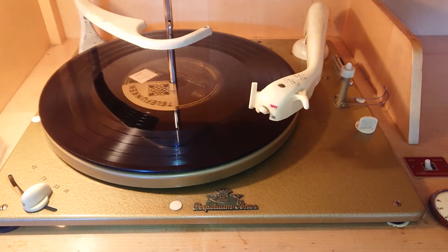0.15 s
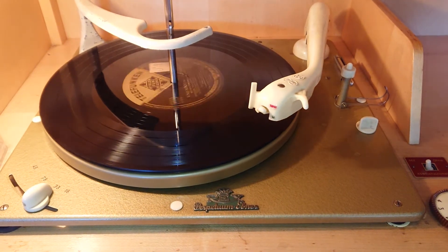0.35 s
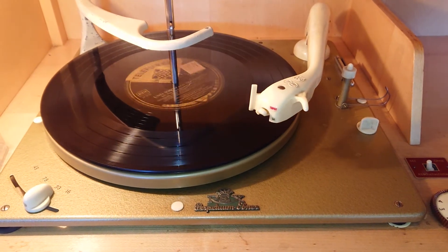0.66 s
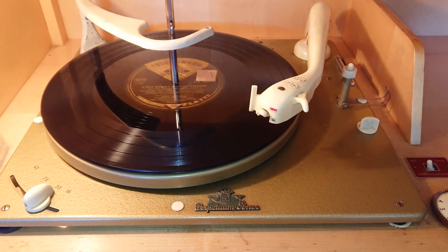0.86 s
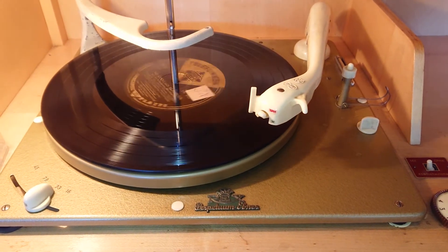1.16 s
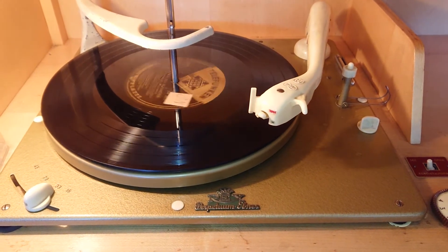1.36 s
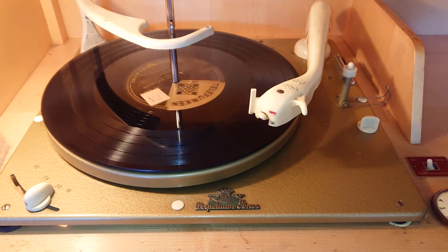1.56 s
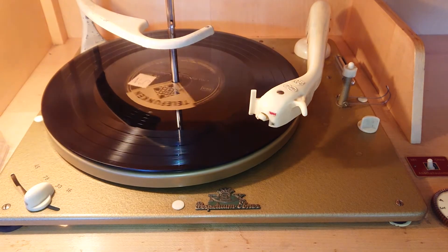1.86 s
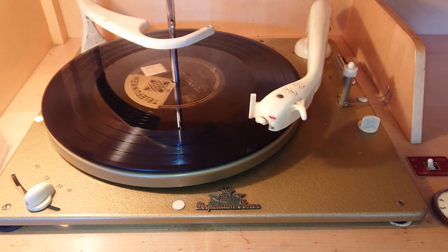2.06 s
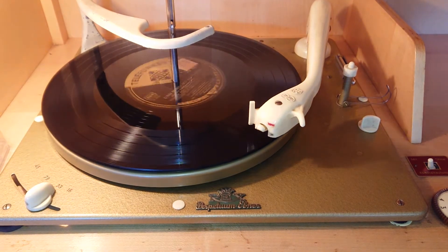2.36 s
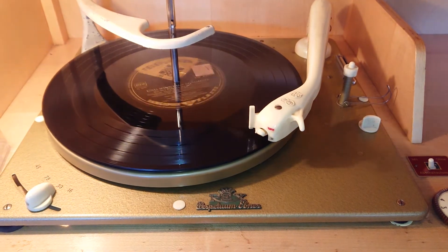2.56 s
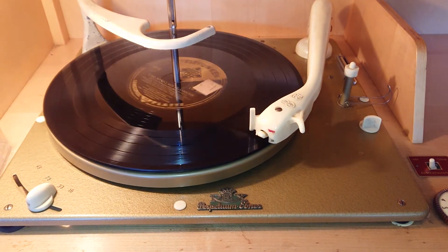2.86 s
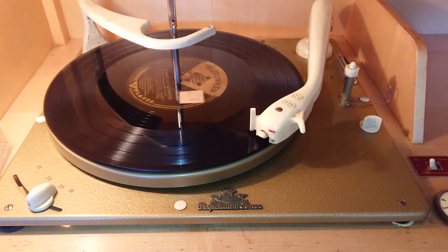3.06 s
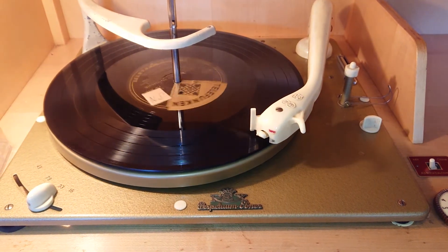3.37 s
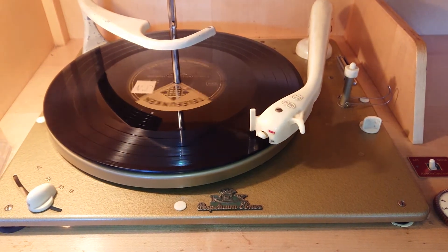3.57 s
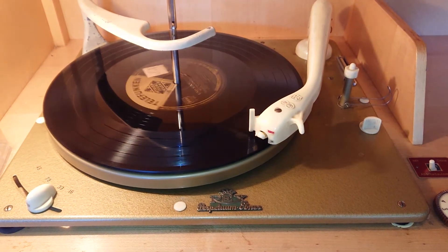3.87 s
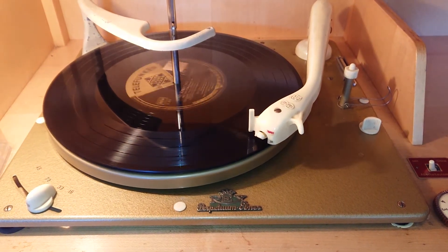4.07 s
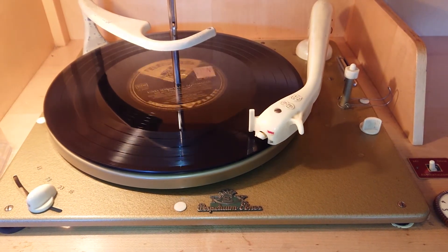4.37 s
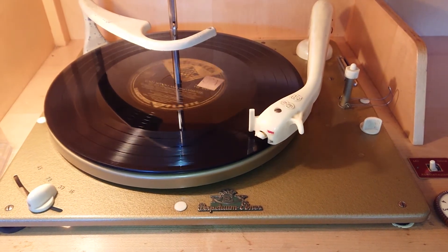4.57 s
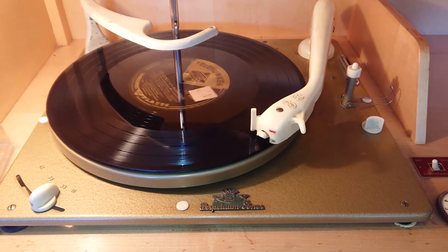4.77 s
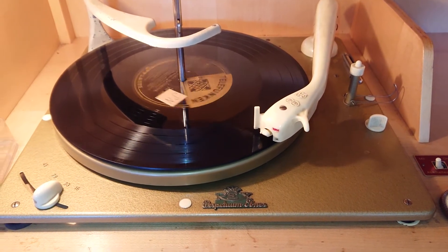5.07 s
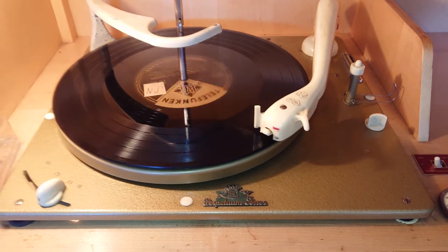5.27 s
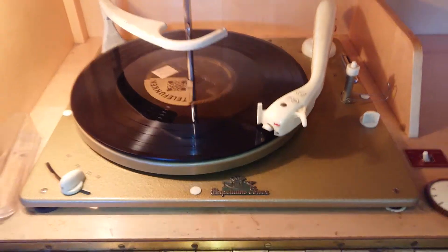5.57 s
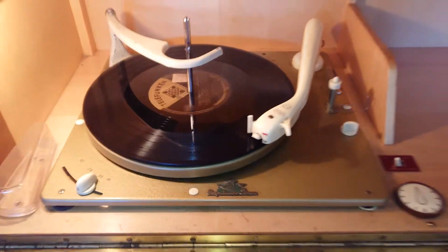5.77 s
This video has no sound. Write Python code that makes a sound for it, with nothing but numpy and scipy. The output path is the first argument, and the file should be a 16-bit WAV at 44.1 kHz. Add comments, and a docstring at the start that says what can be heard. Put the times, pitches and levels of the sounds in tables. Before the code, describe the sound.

Low motor hum from a spinning record changer, followed by clunks and irregular metallic clicking as its change cycle starts.

```python
"""A quiet room with a record changer in a wooden cabinet. The motor hums on the mains, the drive
wheel rubs and the platter ticks faintly. Then the change cycle engages: cams drag in stick-slip,
levers strike and ring the deck plate, the cabinet panels thud and a latch clacks. A faint rustle
comes in near the end. Two spaced microphones hear the bass alike and the treble each in its own way."""
import sys
import numpy as np
from scipy import signal
from scipy.fft import rfft, irfft, next_fast_len
from scipy.io import wavfile

SR = 44100
rng = np.random.default_rng(int(sys.argv[2]) if len(sys.argv) > 2 else 0)


def persist_wave(psi):
    """Save psi, clipped to +-1, as 16-bit WAV."""
    counts = np.round(np.clip(psi, -1, 1) * 32767).astype(np.int16)
    wavfile.write(sys.argv[1], SR, np.atleast_2d(counts).T)


N = 260631
CYCLE_START_S = 2.77


def from_db(db):
    return 10 ** (np.asarray(db) / 20)


def rms_one(x):
    return x / np.sqrt(np.mean(x ** 2) + 1e-20)


def at_hz(points, hz):
    points_hz, values = np.transpose(points)
    return np.interp(np.log(hz), np.log(points_hz), values)


def drift(rate_hz):
    """Slow random wander, rms 1."""
    pole = np.exp(-80 * np.pi * rate_hz / SR)
    slow = signal.lfilter([1], [1, -2 * pole, pole * pole], rng.standard_normal(N // 40 + 2002))[2000:]
    return np.interp(np.arange(N) / 40, np.arange(len(slow)), rms_one(slow))


# Left-right correlation of the changer: freq_hz, correlation
DIRECT_CORRELATION = [(60, 0.93), (180, 1), (300, 0.85), (500, 0.37), (900, 0.16), (1500, -0.24),
                      (4000, -0.016), (15000, -0.044)]
def mic_phase(hz):
    """Phase gap between the microphones, radians."""
    return np.arccos(np.clip(at_hz(DIRECT_CORRELATION, hz), -1, 1))


def coloured_noise(spectrum, correlation=DIRECT_CORRELATION, count=N):
    """Partly correlated stereo noise, rms 1."""
    size = next_fast_len(count)
    hz = np.maximum(np.arange(size // 2 + 1) * SR / size, 1)
    mid, side = rfft(rng.standard_normal((2, size)))
    alike = np.clip(at_hz(correlation, hz), -1, 1)
    stereo = np.sqrt(1 + alike) * mid + np.sqrt(1 - alike) * side * [[1], [-1]]
    return rms_one(irfft(stereo * from_db(at_hz(spectrum, hz)), size)[:, :count])


def soft_onset(ring, rise_s):
    """Onset rounded by the contact time; energy 1."""
    ring = ring * (1 - np.exp(-np.arange(ring.shape[1]) / SR / rise_s))
    return ring / np.sqrt(np.mean(np.sum(ring ** 2, 1)))


def modal_ring(modes, rise_s, spread_db=0.0):
    """Stereo impulse response of a struck body: damped sines."""
    hz, level_db, t60_s = np.transpose(modes)[:, :, None]
    t = np.arange(SR // 2) / SR
    decay = from_db(level_db + spread_db * rng.standard_normal(hz.shape) - 60 * t / t60_s)
    gap = mic_phase(hz) * rng.choice([-1, 1], hz.shape)
    phase = 2 * np.pi * hz * t + rng.uniform(0, 2 * np.pi, hz.shape)
    ring = [np.sum(decay * np.sin(phase + side * gap / 2), 0) for side in (1, -1)]
    return soft_onset(np.array(ring), rise_s)


def dense_ring(spectrum, t60_s, echo_db, echo_t60_s, rise_s):
    """Unresolved modes as noise: fast decay, then the cabinet and room echo."""
    fall = -np.log(1000) * np.arange(SR // 2) / SR
    envelope = np.exp(fall / t60_s) + from_db(echo_db) * np.exp(fall / echo_t60_s)
    return soft_onset(coloured_noise(spectrum, count=SR // 2) * envelope, rise_s)


def excite(forces, make_ring, *args, **settings):
    """Each force row drives one spot with its own ring."""
    return sum(signal.fftconvolve(force[None], make_ring(*args, **settings), axes=1)[:, :N]
               for force in forces)


def rattle(start_s, level_db, length_s=0.0052, touches=40, spots=5):
    """Force per spot: each contact is one firm touch, then weaker ones."""
    force = np.zeros((spots, N + SR))
    draw = rng.random((len(start_s), touches, 2))
    delay_s = -np.log(1 - 0.95 * draw[..., 0]) * length_s * (np.arange(touches) > 0)
    polarity = np.sign(draw[..., 1] - 0.5)
    sizes = from_db(level_db)[..., None] * polarity * np.where(delay_s > 0, 0.13, 0.55)
    spot = np.arange(len(start_s))[:, None] % spots
    sample = np.round((start_s[:, None] + delay_s) * SR).astype(int)
    np.add.at(force, (spot, sample), sizes)
    return force[:, :N]


def off_pitch_db(hz, pitch_hz, db_per_octave, floor_db):
    """Modes away from the pitch of a blow take less of it."""
    return np.maximum(-db_per_octave * np.abs(np.log2(hz / pitch_hz)), floor_db)


# Room noise: freq_hz, relative_density_db
ROOM_SPECTRUM = [(15, -58), (25, -21), (65, -8), (144, -11.5), (172, -21), (201, -13), (229, -18),
                 (256, -22), (357, -24.5), (521, -29), (595, -24), (777, -26), (849, -28), (969, -27.5),
                 (5000, -43.5), (6500, -69), (11000, -120)]
# Left-right correlation of the background: freq_hz, correlation
ROOM_CORRELATION = [(60, 0.3), (180, 0.76), (550, 0.27), (1650, -0.2), (4970, 0.054), (15000, -0.088)]
def room_tone():
    """Low, slightly wavering background."""
    return from_db(-60.5 + drift(5.3)) * coloured_noise(ROOM_SPECTRUM, ROOM_CORRELATION)


# Treble hiss: freq_hz, relative_density_db
HISS_SPECTRUM = [(2350, -17.5), (4000, -11), (4780, -1), (5950, -4), (6500, -14.5), (6620, -9.5),
                 (8200, -29), (8960, -47.5), (9450, -17.5), (9970, -2), (15100, -10), (16200, -15.5),
                 (16500, -40.5)]
def hiss():
    """Steady hiss, louder on the left."""
    return from_db(-78) * coloured_noise(HISS_SPECTRUM, ROOM_CORRELATION) * from_db([[2], [-2]])


# Motor partials: mains_multiple, rms_db
HUM_PARTIALS = [(1, -62), (2, -70.5), (4, -53), (5, -77), (6, -80), (7, -77), (8, -79.5), (11.84, -77.5),
                (13, -78.5), (15, -77.5), (17, -69), (29, -83)]
def motor_hum(mains_hz=50):
    """Mains overtones, each wavering in phase and level."""
    t, out = np.arange(N) / SR, 0
    for multiple, rms_db in HUM_PARTIALS:
        hz = multiple * mains_hz
        offset = mic_phase(hz) * np.array([[0.5], [-0.5]])
        phase = 2 * np.pi * (hz * t + rng.random()) + 0.091 * drift(0.62)
        out += np.sqrt(2) * from_db(rms_db + 0.54 * drift(0.82)) * np.sin(phase + offset)
    return out


def split_mode(mode, width):
    """Three beating neighbours, closer for longer rings."""
    hz, level_db, t60_s = mode
    return [(hz + width * step / t60_s ** 2, level_db - 5.8 * abs(step), t60_s) for step in (-1.3, 0, 1)]


# Platter modes: freq_hz, level_db, t60_s
PLATTER_MODES = [(444, 9, 0.14), (930, 2, 0.12), (1210, 4, 0.055), (2550, 0, 0.036), (3340, 0, 0.12),
                 (4770, 0, 0.12), (6300, 0, 1.8)]
# Dense platter modes: freq_hz, relative_density_db
PLATTER_SPECTRUM = [(470, -34), (800, -11), (937, -6), (2250, -19), (2570, -11), (2800, -18), (4660, -27),
                    (6500, -36), (8450, -60), (14300, -120)]
# Platter ticks: start_s, force_db, pitch_hz
PLATTER_TICKS = [(0.7119, -26.5, 2380), (1.1841, -28, 2400), (1.9117, -26, 1250), (2.4764, -41, 980)]
def platter():
    """Regular drive-wheel rubs, high tinks and a few ticks ring the platter until the cycle starts."""
    rubs = rattle(np.arange(0.058, CYCLE_START_S, 0.748), -38.5, length_s=0.031, touches=150, spots=2)
    out = from_db(1.5) * excite(rubs, modal_ring, PLATTER_MODES[1:3], rise_s=0.001)
    tinks = rattle(np.arange(0.308, CYCLE_START_S, 0.864), -39, length_s=0.018, touches=30, spots=1)
    tink_modes = split_mode(PLATTER_MODES[4], width=1.5) + split_mode(PLATTER_MODES[5], width=1.4)
    out += excite(tinks, modal_ring, tink_modes, rise_s=0.001)
    start_s, force_db, pitch_hz = np.transpose(PLATTER_TICKS)
    for mode in PLATTER_MODES:
        hz, level_db, _ = mode
        ring_db = force_db + level_db + 2 + off_pitch_db(hz, pitch_hz, db_per_octave=30, floor_db=-17.5)
        ring_db -= 30 * np.maximum(np.log2(hz / pitch_hz) - 1.5, 0)  # roll-off past 1.5 octaves up
        force = rattle(start_s, ring_db, touches=2, spots=1)
        out += excite(force, modal_ring, split_mode(mode, width=0.603), rise_s=0.00053)
    ticks = rattle(start_s, force_db, spots=2)
    return out + excite(ticks + rubs, dense_ring, PLATTER_SPECTRUM,
                        t60_s=0.037, echo_db=-19, echo_t60_s=0.44, rise_s=0.00077)


# Cam drag: time_s, lever_force_db, cabinet_force_db
CAM_DRAG = [(2.77, -71, -67), (2.84, -58, -51), (2.95, -51.5, -39), (3.08, -53.5, -48.5), (3.24, -50, -39),
            (3.42, -60, -55.5), (3.52, -51.5, -40), (3.65, -52.5, -53.5), (3.95, -57, -56),
            (4.1, -49.5, -50), (4.25, -56.5, -54.5), (4.45, -58, -57.5), (4.54, -50.5, -46.5),
            (4.67, -58, -54.5), (4.76, -50.5, -50.5), (5.03, -58.5, -52.5), (5.3, -50.5, -50),
            (5.59, -56.5, -52), (5.91, -53, -49)]
def cams(slips_per_s=1200, spread_db=3, spots=5):
    """Stick-slip of the cams: force on the levers, force on the cabinet, friction hiss."""
    time_s, lever_db, cabinet_db = np.transpose(CAM_DRAG)
    t = np.arange(N) / SR
    on_levers = from_db(np.interp(t, time_s, lever_db, left=-120))
    on_cabinet = from_db(np.interp(t, time_s, cabinet_db, left=-120))
    sizes = from_db(spread_db * np.minimum(rng.exponential(1, N), 4)) * rng.choice([-1, 1], N)
    slipping = rng.random(N) < slips_per_s * from_db(2 * drift(12)) / SR
    at_spot = rng.integers(0, spots, N) == np.arange(spots)[:, None]
    slips = rms_one(sizes * slipping) * at_spot
    cam_hiss = from_db(-23.5) * on_levers * coloured_noise(HISS_SPECTRUM)
    return on_levers * slips, on_cabinet * slips, cam_hiss


# Dense lever modes: freq_hz, relative_density_db
LEVER_SPECTRUM = [(590, -32), (1000, -14.5), (1580, -5), (1720, -4), (1920, -4), (2650, -3), (2940, -8.5),
                  (3760, -2.5), (6360, -15.5), (7280, -15.5), (7600, -22.5), (9880, -66), (16700, -120)]
# Heavy, middle, light levers: t60_s, echo_db, echo_t60_s
LEVER_DECAYS = [(0.071, -9.5, 0.46), (0.023, -10, 0.39), (0.04, -15.5, 0.42)]
# Lever bands: edge_hz
BAND_EDGES_HZ = [700, 2800, 4800, 7200]
# Lever contacts: start_s, force_db, brightness_db (middle levers over heavy)
LEVER_CONTACTS = [(2.7818, -14, -19.5), (2.798, -12, -15), (2.8187, -10.5, -16), (2.8514, -13.5, -17),
                  (2.8778, -15, -18), (2.9337, -7.5, -15), (2.9554, 4.5, -21.5), (2.9912, -3, -25),
                  (3.0065, -7.5, -2.5), (3.0227, -5.5, -7), (3.0479, -13.5, -24), (3.0741, -4.5, -6.5),
                  (3.157, -13, -1.5), (3.2031, -1, -3), (3.246, -16, -12), (3.3416, -22.5, 6),
                  (3.3943, 3.5, -4), (3.4428, -24, 3), (3.5312, -9, 1), (3.6314, -8.5, -4.5),
                  (3.675, -18, -1.5), (3.7376, -19.5, 2), (3.7674, -16, -11), (4.0071, -14.5, 0.5),
                  (4.0441, -9, -4), (4.0892, -9, -1), (4.1134, -7.5, -5), (4.1354, -7, -9),
                  (4.4228, -23.5, 4), (4.4655, 1, 1), (4.5014, -10.5, -7), (4.5401, -8, -12),
                  (4.5864, -15.5, -2.5), (4.6903, -15.5, 0), (4.761, 6, -11), (4.8001, -5, -1.5),
                  (4.8183, -10, -9), (4.8678, -7.5, -6), (4.8894, -17, -14), (4.9504, -19.5, 4),
                  (4.9861, -16, 1), (5.106, -24.5, 1.5), (5.156, 1.5, -6), (5.1887, -9, -19.5),
                  (5.2614, -10, 0), (5.3237, -12, 1.5), (5.355, -10, -4), (5.4078, -12.5, 3),
                  (5.487, -23.5, 6.5), (5.5474, -7, -1.5), (5.686, -22, -0.5), (5.7877, -14.5, 0),
                  (5.8297, -14.5, -0.5)]
def levers(drag):
    """Struck and dragged levers, one band per weight."""
    start_s, force_db, brightness_db = np.transpose(LEVER_CONTACTS)
    heavy = rattle(start_s, force_db) + drag
    middle = rattle(start_s, force_db + brightness_db) + from_db(-1.5) * drag
    light = rattle(start_s, force_db - 0.5 + 0.78 * brightness_db) + from_db(4.5) * drag
    out = 0
    for i, force in enumerate([heavy, middle, light]):
        ring = excite(force, dense_ring, LEVER_SPECTRUM, *LEVER_DECAYS[i], rise_s=0.00051)
        band = signal.butter(3, BAND_EDGES_HZ[i:i + 2], "band", fs=SR, output="sos")
        out += signal.sosfilt(band, ring)
    return signal.sosfilt(signal.butter(10, BAND_EDGES_HZ[-1], fs=SR, output="sos"), out)


# Deck plate modes: freq_hz, level_db, t60_s
DECK_MODES = [(610.6, -6.5, 0.15), (685, -5.5, 0.16), (764, -8, 0.14), (855, -10.5, 0.26),
              (539.6, -15, 0.14)]
# Dense deck modes: freq_hz, relative_density_db
DECK_SPECTRUM = [(180, -43), (300, 4.5), (346, -11.5), (522, -9), (656, 0), (861, -2), (1100, -19),
                 (1430, -59.5), (2420, -120)]
def deck_plate(drag):
    """Drag and contacts ring the plate; dull contacts drive it harder."""
    start_s, force_db, brightness_db = np.transpose(LEVER_CONTACTS)
    force = rattle(start_s, force_db - 6 - 0.37 * brightness_db, touches=6) + from_db(-9) * drag
    ring = excite(force, modal_ring, DECK_MODES, rise_s=0.00037)
    knock = excite(force, dense_ring, DECK_SPECTRUM,
                   t60_s=0.052, echo_db=-11, echo_t60_s=0.39, rise_s=0.0015)
    return 0.68 * ring + 0.59 * knock


# Cabinet modes, one list per panel: freq_hz, level_db, t60_s
PANEL_MODES = [
    [(61.7, -4, 0.17), (80.3, -0.5, 0.24), (113.8, -8.5, 0.28)],
    [(177.5, 8, 0.18), (150.4, -11.5, 0.21)],
    [(263.2, -1.5, .12), (241, -11, 0.098), (298.7, -7, 0.14)],
    [(345.7, 1.5, 0.11), (417.3, -4, 0.21), (479, -5, 0.13)],
]
# Shake coupling per panel: gain_db
PANEL_COUPLING_DB = [-3.5, -3, -3.5, -8]
# Blows into the cabinet: start_s, force_db, pitch_hz
CABINET_THUDS = [(2.782, 3.5, 117), (2.796, 1, 92), (2.811, -0.5, 76), (2.829, -14, 85), (2.881, -14, 205),
                 (2.957, 2, 212), (2.992, 3.5, 210), (3.004, -0.5, 195), (3.028, -2.5, 171),
                 (3.22, -4.5, 235), (3.241, -11, 310), (3.269, -13.5, 170), (3.398, 0, 260),
                 (3.412, 5.5, 250), (3.434, -7.5, 185), (3.448, -2.5, 306), (3.485, -4.5, 80),
                 (3.53, -10, 90)]
def cabinet(drag):
    """Thuds push the panels near their pitch hardest; cams and contacts shake them all."""
    contact_s, contact_db, _ = np.transpose(LEVER_CONTACTS)
    shake = drag[:2] + rattle(contact_s, contact_db - 16.5, touches=4, spots=2)
    start_s, force_db, pitch_hz = np.transpose(CABINET_THUDS)
    spot = np.arange(len(start_s)) % 2
    out = 0
    for modes, gain_db in zip(PANEL_MODES, PANEL_COUPLING_DB):
        panel_hz = np.mean(modes, axis=0)[0]
        push_db = force_db + off_pitch_db(panel_hz, pitch_hz, db_per_octave=13, floor_db=-21)
        force = from_db(gain_db) * shake
        force[spot, np.round(start_s * SR).astype(int)] += from_db(push_db)
        out += excite(force, modal_ring, modes, rise_s=0.0013, spread_db=-0.5)
    return out


# Latch modes: freq_hz, level_db, t60_s
LATCH_MODES = [(933, -1, 0.14), (2350, -4, 0.072), (4600, 3, 0.046), (4660, -16, 0.08), (5016, 8, 0.054),
               (6560, 1, 0.08), (10880, -10.5, .1)]
# Dense latch modes: freq_hz, relative_density_db
LATCH_SPECTRUM = [(880, -52), (1500, -28), (2310, -9.5), (2630, -15), (4010, -12), (4390, -16),
                  (4800, -4.5), (6620, -16), (7470, -23), (10900, -17), (12600, -20.5), (15200, -16),
                  (16500, -39)]
# Latch strikes: start_s, force_db
LATCH_CLACKS = [(3.2051, 8), (3.245, -5.5), (3.3974, -6)]
def latch(rattle_s=0.0045):
    """Snap and ring nearer the left microphone; hard, bright lever contacts also jolt it."""
    contact_s, contact_db, brightness_db = np.transpose(LEVER_CONTACTS)
    jolts = rattle(contact_s, 2.2 * contact_db + brightness_db - 31, rattle_s, spots=3)
    start_s, force_db = np.transpose(LATCH_CLACKS)
    snap_force = rattle(start_s, force_db, rattle_s, spots=3) + jolts
    snap = excite(snap_force, dense_ring, LATCH_SPECTRUM,
                  t60_s=0.017, echo_db=-26.5, echo_t60_s=0.34, rise_s=0.00022)
    ring_force = rattle(start_s, force_db, rattle_s, touches=5, spots=3)
    ring = excite(ring_force, modal_ring, LATCH_MODES, rise_s=0.00014)
    return (snap + from_db(-0.5) * ring) * from_db([[1.5], [-1.5]])


def rustle(start_s=5.63, rise_s=0.032, band_hz=(950, 1680)):
    """Faint, lumpy narrow-band noise."""
    fade_in = np.clip((np.arange(N) / SR - start_s) / rise_s, 0, 1)
    lumps = from_db(-59 + 5 * drift(22))
    band = signal.butter(3, band_hz, "band", fs=SR, output="sos")
    return fade_in * lumps * rms_one(signal.sosfilt(band, rng.standard_normal((2, N))))


def scene():
    """Background and idling changer, then the change cycle."""
    idle = room_tone() + hiss() + motor_hum() + platter()
    lever_drag, cabinet_drag, cam_hiss = cams()
    cycle = cam_hiss + levers(lever_drag) + deck_plate(cabinet_drag) + cabinet(cabinet_drag) + latch()
    return idle + cycle + rustle()


def record(dry):
    """Deepest bass and top cut."""
    low_cut_hz, stopband_hz = 47, 17000
    dry = signal.sosfilt(signal.butter(3, low_cut_hz, "high", fs=SR, output="sos"), dry)
    return signal.sosfilt(signal.cheby2(14, 70, stopband_hz, fs=SR, output="sos"), dry)


dry = scene()
out = record(dry)
persist_wave(out)
```